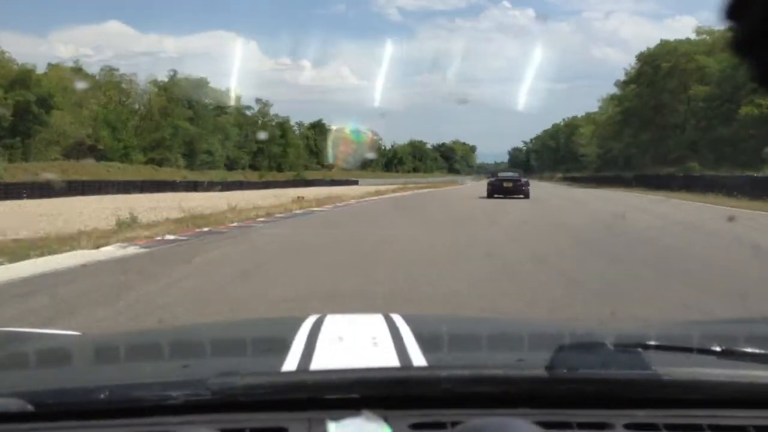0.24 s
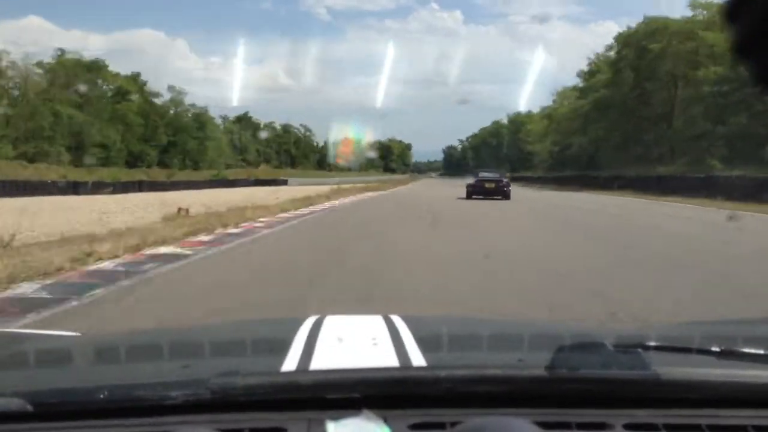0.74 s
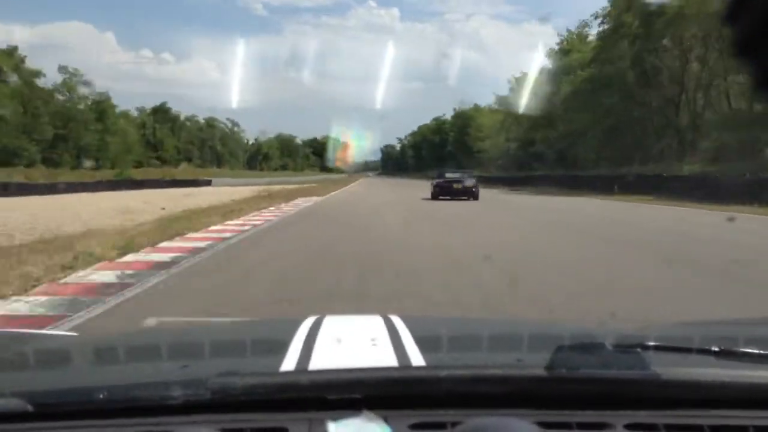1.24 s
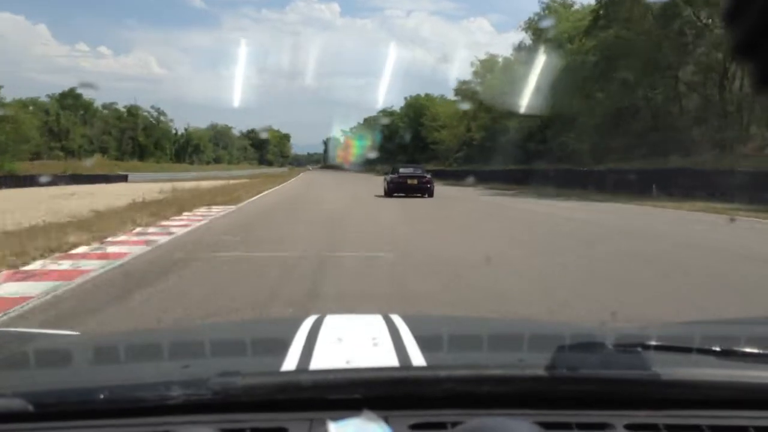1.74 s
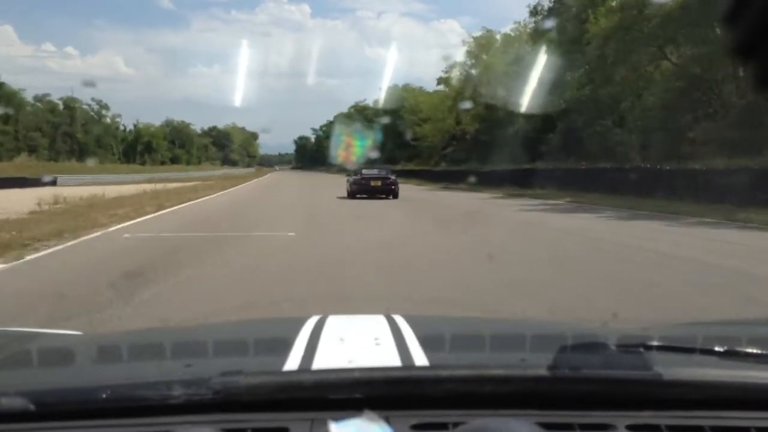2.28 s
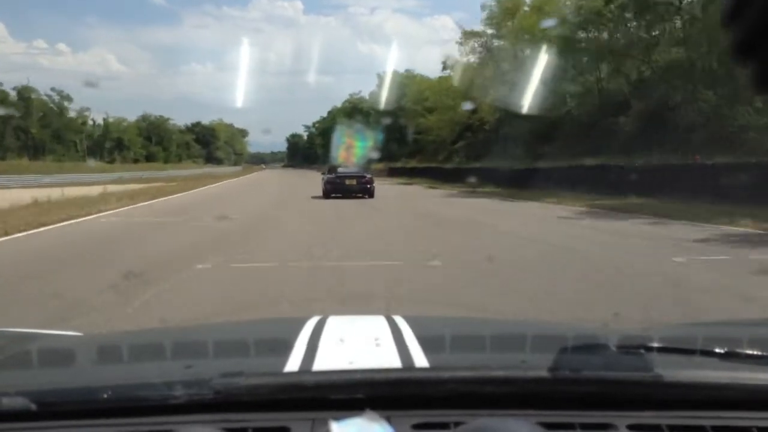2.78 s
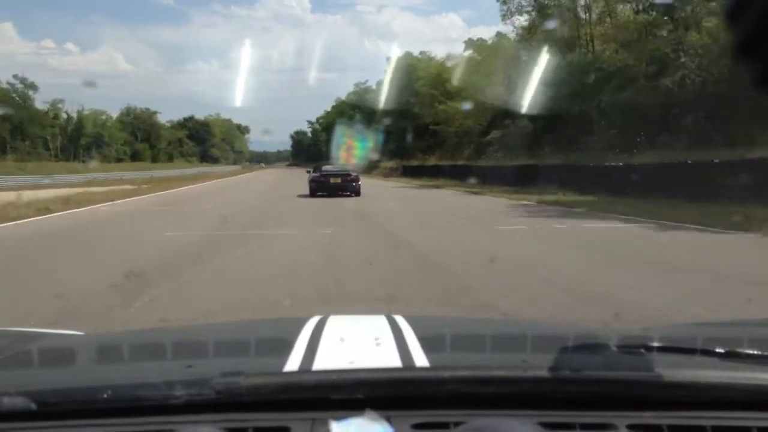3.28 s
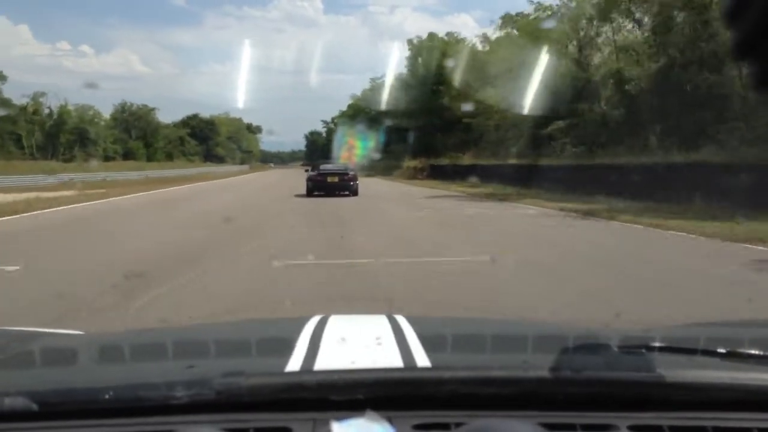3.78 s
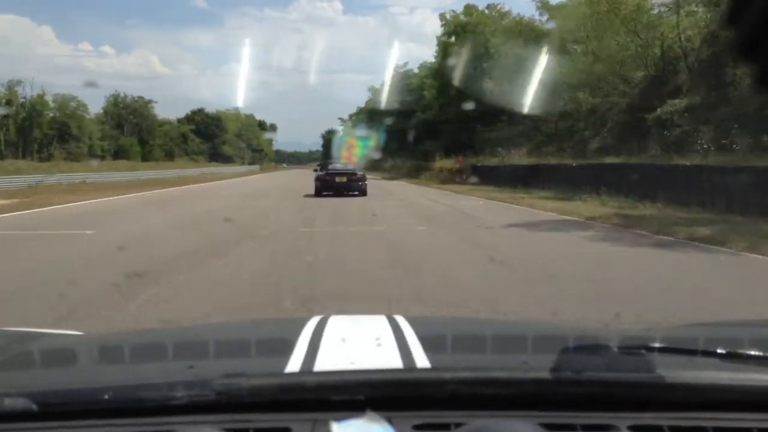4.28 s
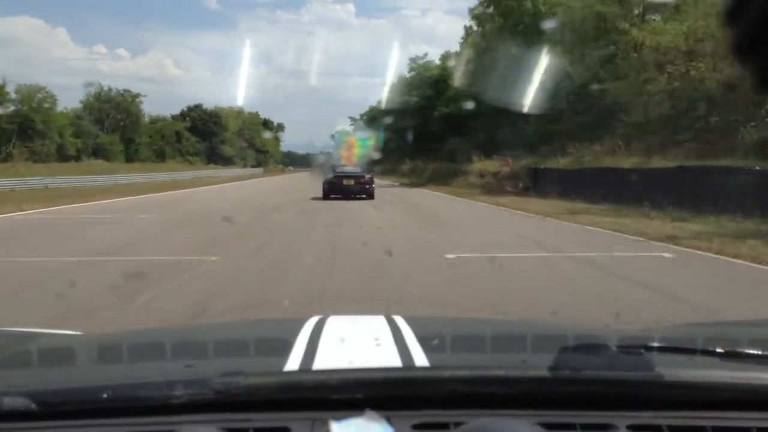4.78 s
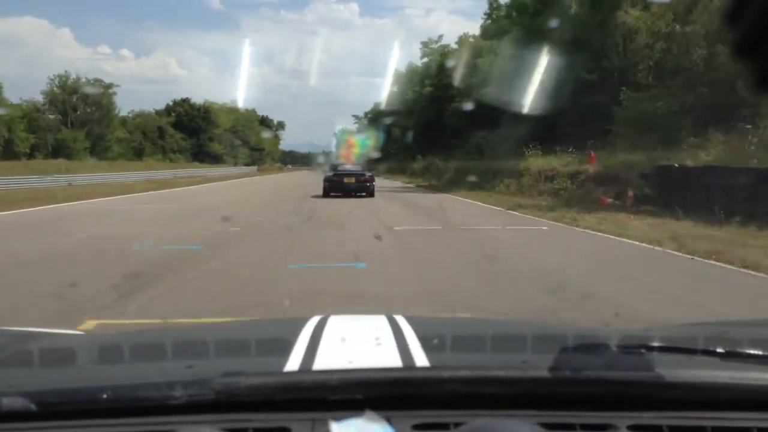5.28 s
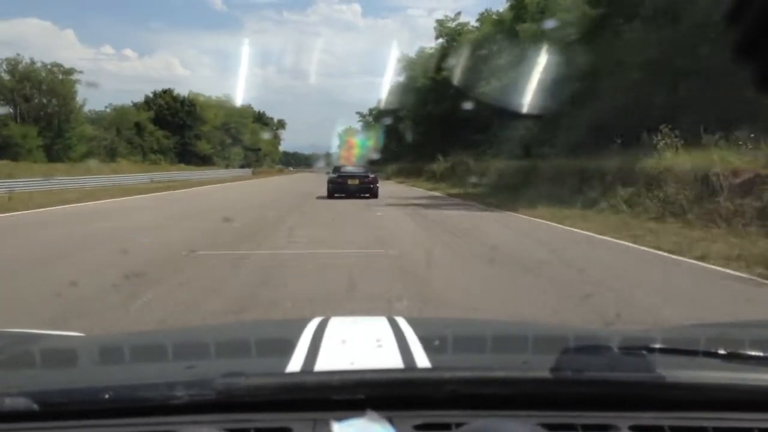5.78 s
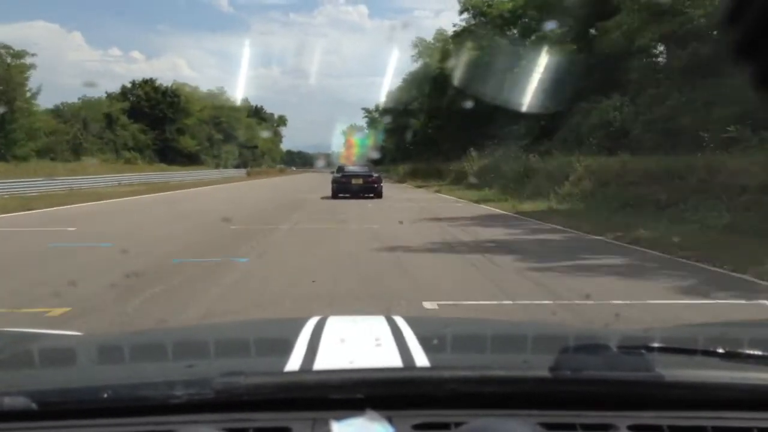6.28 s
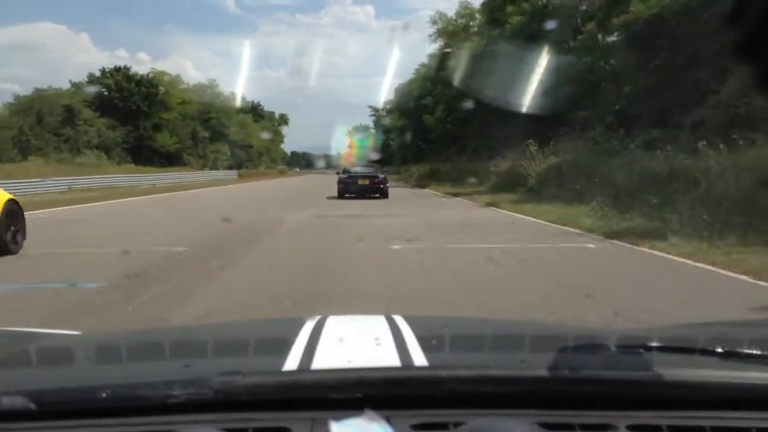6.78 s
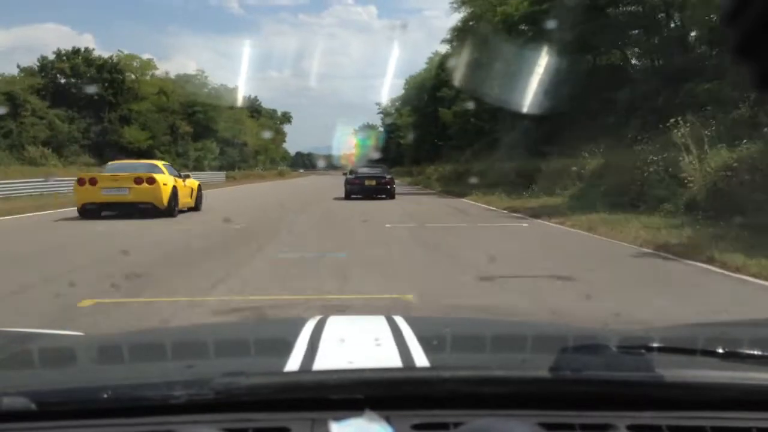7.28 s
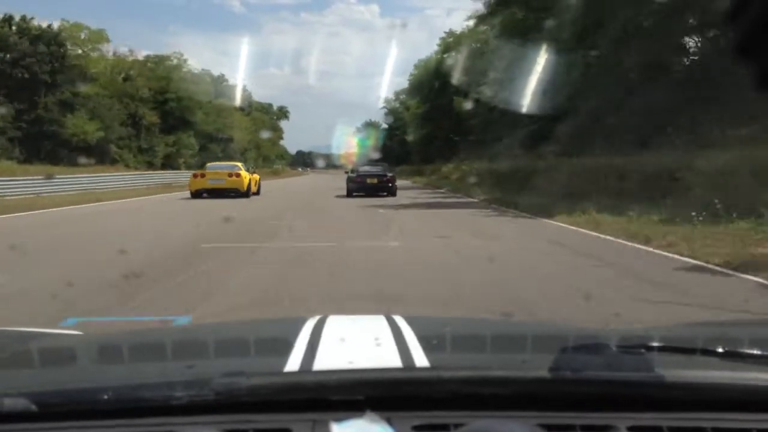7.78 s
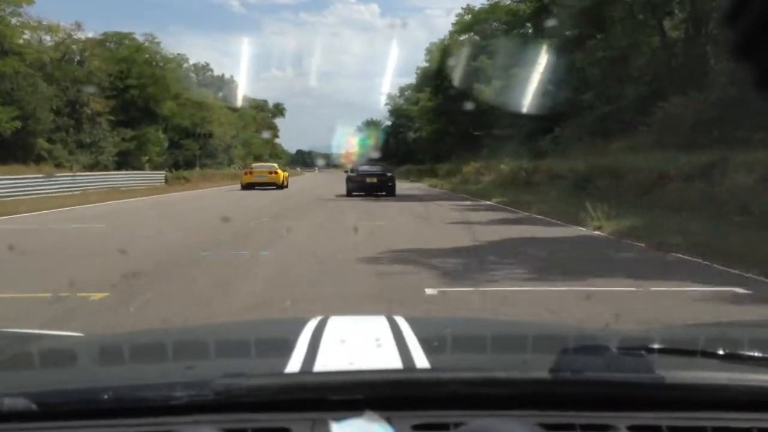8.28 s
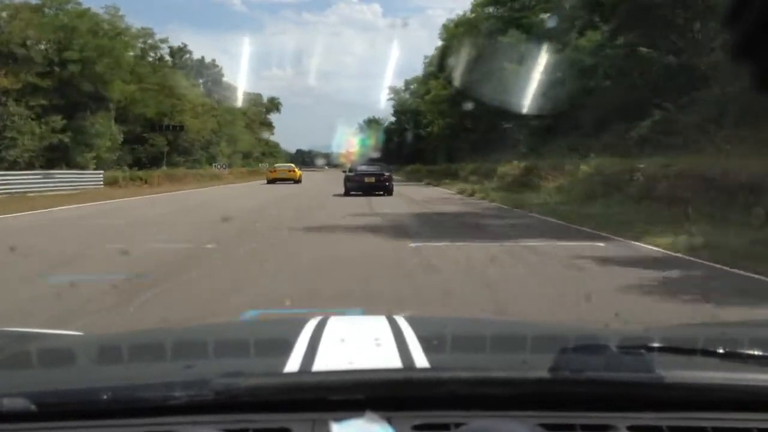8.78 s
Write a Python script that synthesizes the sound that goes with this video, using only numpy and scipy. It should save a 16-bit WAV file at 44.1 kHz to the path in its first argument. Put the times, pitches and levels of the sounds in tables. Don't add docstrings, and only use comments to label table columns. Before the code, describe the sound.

Inside a car on a race circuit, the engine pulls hard, shifts up and settles into droning road noise; another car roars past on the left.

```python
import sys
import numpy as np
from scipy import signal
from scipy.io import wavfile
from scipy.ndimage import uniform_filter1d

SR = 44100
rng = np.random.default_rng(int(sys.argv[2]) if len(sys.argv) > 2 else 0)


def master_out(mix):
    frames = np.transpose(np.atleast_2d(mix))
    ceiling = np.clip(frames, -1, 1)
    pcm = np.round(ceiling * 32767).astype(np.int16)
    wavfile.write(sys.argv[1], SR, pcm)


def gain_from_db(level_db):
    decades = np.asarray(level_db, float) / 20
    return 10 ** decades


N = 399105

# (time [s], level [dB]); each layer follows by its share
ROUGHNESS = [(0, -1.5), (1.06, -6.5), (1.21, -2.5), (1.79, -1.5), (2.9, 2), (3.1, 0.5), (4.46, 1.5),
             (5.87, 0.5), (7.33, 0.5), (7.79, -1.5), (8.01, 0.5), (8.75, -1), (9.05, -1.5)]
# (frequency [Hz], level [dB per Hz])
ROAD_BOOM = [(18, -43), (30, -34), (50, -19.5), (65, -18.5), (82, -25), (100, -5), (130, -2), (221, -2.5),
             (377, -8.5), (436, -15.5), (600, -15), (780, -24)]
ROAD_ROAR = [(260, -24), (450, -0.5), (736, -5), (927, -5.5), (1020, -6), (1120, -4), (1360, -8),
             (3200, -24), (4160, -63), (7040, -120)]
ROAD_HISS = [(1290, -31), (2200, -1), (3060, -7), (3380, -3.5), (3660, -4.5), (7880, -9.5), (9490, -17),
             (13900, -20), (15200, -23)]
BOOM_DB, ROAR_DB, HISS_DB = -20.5, -30, -40
ROAR_SHARE, HISS_SHARE = 0.32, 0.25
# (frequency [Hz], width [Hz], level over the boom [dB])
PANELS = [(133.9, 5.4, -12), (151, 5.4, -10.5), (170.1, 7.4, -10), (312.8, 7.1, -15), (427.7, 12, -15),
          (589, 48, -23), (839, 18, -22.5), (925, 140, -18.5), (1117, 24, -25), (1336, 82, -27),
          (1654, 24, -30)]
# (start [s], end [s], frequency [Hz], level [dB])
CAVITY = [
    (1.322, 1.549, 230.1, -26),
    (2.304, 2.896, 234.3, -26),
    (2.904, 3.692, 232.1, -23.5),
    (3.685, 4.294, 229.4, -22),
    (4.7, 5.289, 225.3, -26),
    (5.296, 6.593, 232, -23.5),
    (7.9, 8.5, 231.3, -29),
]
CAVITY_IDLE_DB, CAVITY_EDGE_S = -33.5, 0.21
# (start [s], end [s], level over the steady hiss [dB])
GUSTS = [
    (1.45, 1.62, 2),
    (2.7, 3.0, 2),
    (5.4, 5.55, 1),
    (7.9, 8.1, 2),
]
GUST_EDGE_S = .08

# (time [s], thud level [dB], thud length [s], dip of the firing tone
# [dB])
JOLTS = [(1.215, -31, .016, -12), (1.315, -50, .016, -8), (1.6, -50, .03, -3), (1.715, -50, .012, -9),
         (1.755, -50, .012, -9), (1.838, -34, .025, -18), (2.718, -30, .06, -7), (2.84, -34, .05, -5),
         (2.93, -24, .08, -8), (3.04, -26, .045, -6), (4.34, -26, .06, -7)]
DIP_SPREAD = 1.66
# (frequency [Hz], level [dB per Hz])
THUD_COLOUR = [(55, -36), (85, 5), (130, 6), (300, -18), (900, -29)]

# (time [s], peak level [dB], brightness [0-1])
GRIT = [(.3254, -18.5, .3), (.3645, -20, .2), (.4194, -33, 0.4), (.7462, -29.5, 0.7), (1.1997, -27.5, 0.6),
        (1.5604, -33, .3), (3.1213, -37, .3), (3.475, -29.5, .3), (3.5494, -36, .3), (3.6172, -31, .3),
        (3.449, -35, .3), (3.775, -32, .3), (4.276, -43, .3), (4.299, -37, .3), (4.3994, -31, .3),
        (4.46, -32, .3), (4.56, -34, .3), (4.8693, -34, .1), (5.027, -22, 0.36), (5.1694, -32, .3),
        (5.2275, -21.5, 0.45), (7.838, -37, .1), (7.87, -28, .1), (8.6911, -33, .3), (8.8298, -31, .3)]
STONES = [
    (7.7915, -19, 0.55),
    (7.862, -30, .5),
]
GRIT_T60_S, GRIT_RISE_S, STONE_T60_S, STONE_RISE_S = 0.15, 0.003, 0.059, 0.00072
# (frequency [Hz], level [dB per Hz])
GRIT_COLOUR = [(1500, -30), (3300, 1.5), (5000, -1.5), (6500, 2.5), (8000, 4), (9500, -2.5), (12500, -9),
               (15500, -8)]
GRIT_BRIGHT = [(6000, -17), (9500, -5), (12000, 1), (14000, -2), (15500, -1)]
STONE_COLOUR = [(3800, -25), (5500, -2), (8000, -1), (11000, -2), (14500, 2), (15500, 1)]

# (start [s], end [s], frequency [Hz], width [Hz], level [dB])
RINGS = [
    (1.83, 1.93, 432, 8, -28),
    (0, .45, 2180, 60, -46),
    (.48, .55, 2190, 30, -38),
]
# (start [s], end [s], frequency [Hz], width [Hz], level [dB])
RISING = [
    (0, .7, 1182, 50, -46),
    (.3, 1.2, 836, 30, -41),
    (0, .55, 590, 15, -38),
    (.45, .8, 1235, 30, -43),
]
# (start [s], end [s], frequency [Hz], width [Hz], level [dB])
WHISTLE = [
    (0, 1.1, 11790, 10, -62),
]
# (start [s], end [s], frequency [Hz], width [Hz], level [dB])
CHIRPS = [(1.17, 1.205, 2590, 40, -38), (1.17, 1.2, 1045, 60, -35), (1.33, 1.36, 978, 60, -32),
          (1.395, 1.43, 980, 60, -31), (1.44, 1.47, 1020, 60, -31), (1.518, 1.547, 975, 40, -25),
          (1.553, 1.575, 1290, 160, -29), (1.55, 1.58, 1600, 400, -35), (1.675, 1.715, 950, 50, -30),
          (1.21, 1.24, 1100, 60, -34), (1.13, 1.17, 1290, 60, -35), (1.74, 1.8, 870, 40, -35),
          (1.235, 1.3, 165, 20, -25), (1.33, 1.4, 160, 30, -27), (1.6, 1.64, 900, 60, -35)]
# (start [s], end [s], frequency [Hz], width [Hz], level [dB])
WHINE = [
    (6.48, 6.72, 1655, 30, -41),
    (6.68, 7.12, 1678, 30, -40),
    (7.08, 7.32, 1688, 50, -40.5),
    (7.33, 7.49, 1703, 30, -42.5),
    (7.48, 7.79, 1686, 40, -41),
    (7.85, 8, 1690, 40, -43),
]
WANDER, WHINE_WANDER = .0025, .0055
RISING_GLIDE, WHISTLE_GLIDE, CHIRP_GLIDE = .035, -.0475, -.012

# (time [s], cam rate [Hz], level [dB])
BOOM = [
    (5.2, 46, -58),
    (5.4, 46.7, -28),
    (5.8, 47.7, -23),
    (6.0, 48.93, -15),
    (6.12, 48.9, -14),
    (6.3, 48.7, -16),
    (6.42, 47.8, -17),
    (6.6, 46.3, -31),
    (6.68, 45.2, -45),
]
# (time [s], cam rate [Hz], level [dB])
RASP = [
    (5.95, 50.1, -64),
    (6.1, 49.3, -30),
    (6.2, 49.8, -27.5),
    (6.3, 49.84, -23),
    (6.4, 50, -20.5),
    (6.5, 49.5, -17),
    (6.62, 47.86, -19.5),
    (6.65, 47.1, -35),
    (6.68, 47.35, -52),
]
# (time [s], cam rate [Hz], level [dB])
AWAY = [
    (7.68, 34.4, -45),
    (7.8, 34.8, -22.5),
    (7.95, 35.06, -20),
    (9.05, 37.1, -19.5),
]
BURBLE_PER_S = 16
# (multiple of the cam rate, level [dB])
BOOM_ORDERS = [(3, -10), (5, -5), (6, 0), (7, -11), (9, -14), (12, -17)]
RASP_ORDERS = [(4, -1.5), (6, -3), (7, -11), (8, -1.5), (9, -4.5), (11, -13), (12, -6), (15, -14),
               (16, -3.5), (17, -14), (20, -19), (21, -6.5), (22, -16), (23, -18), (24, -16)]
AWAY_ORDERS = [(4, -12), (5, -10), (8, -2), (9, -16), (10, -17.5), (12, -22), (16, -31)]
# (start [s], end [s], multiple, level [dB])
PASS_FAVOURED = [(6.4, 6.3, 16, -9), (6.35, 6.53, 16, 2.5), (6.55, 8, 16, -8), (6.28, 6.48, 21, -5),
                 (6.2, 6.3, 12, 3), (5.3, 5.4, 8, 5), (5.7, 6.45, 8, 4.5), (5.7, 6.45, 17, 3.5),
                 (4.9, 6.2, 21, 9.5), (5.7, 5.9, 5, -13), (6.47, 6.7, 8, -7), (6.9, 5.8, 20, 5),
                 (5.9, 6.1, 12, -3), (6.45, 6.7, 9, 1.5), (8.1, 8.3, 5, 8), (8.45, 8.7, 8, 2),
                 (8.68, 8.8, 8, -6), (8.92, 9.2, 8, -11)]
# (time [s], nearness [dB], tyre hiss over roar [dB])
RUSH = [
    (5.6, -37, -8),
    (5.95, -22.5, -16.5),
    (6.06, -16.5, -14.5),
    (6.3, -10.5, -13.5),
    (6.42, -9, -12),
    (6.49, -8, -6),
    (6.52, -15, -1),
    (6.615, -13, -4),
    (6.655, -17.5, -15.5),
]
RUSH_TAIL_S, RUSH_TAIL_DB = .13, -13
# (frequency [Hz], level [dB per Hz])
RUSH_ROAR = [(250, -32), (500, 5), (1050, 8.5), (1500, 1), (1900, -4.5), (2500, -6), (3500, -8),
             (6000, -50)]
RUSH_HISS = [(1200, -32), (2200, -7), (3300, -2.5), (4200, 0), (5400, 2), (7500, -1), (9500, -8.5),
             (12500, -8.5), (15500, -11)]
# (start [s], end [s], frequency [Hz], width [Hz], level [dB])
FLANK = [(6.1, 6.19, 1040, 40, -26), (6.24, 6.3, 645, 45, -25), (6.31, 6.37, 835, 45, -19),
         (6.04, 6.11, 1800, 400, -34), (6.04, 6.11, 2250, 400, -35), (6.04, 6.12, 2650, 400, -35),
         (6.53, 6.62, 1030, 50, -28), (6.45, 6.5, 1100, 60, -27), (6.44, 6.5, 3270, 390, -29),
         (6.55, 6.61, 3300, 200, -28), (6.39, 6.52, 790, 30, -25), (6.2, 6.5, 1000, 400, -29),
         (6.22, 6.5, 1350, 400, -31), (6.44, 6.475, 6500, 250, -23), (6.475, 6.51, 5400, 300, -22),
         (6.53, 6.575, 6300, 300, -26), (6.55, 6.62, 5350, 250, -27), (6.375, 6.4, 6200, 300, -28),
         (6.48, 6.52, 4500, 250, -28)]
# (start [s], end [s], frequency [Hz], width [Hz], level [dB])
SWISH = [
    (6.44, 6.51, 6400, 390, -26),
    (6.53, 6.6, 7600, 500, -28),
]
# (start [s], end [s], frequency [Hz], width [Hz], level [dB])
STREAKS = [
    (6.12, 6.28, 2220, 390, -32),
    (6.15, 6.22, 1900, 250, -34),
    (6.24, 6.33, 1900, 250, -35),
    (6.38, 6.46, 2600, 200, -33),
    (6.52, 6.58, 2520, 140, -34),
    (6.5, 6.6, 2050, 140, -37),
]
FLANK_GLIDE, SWISH_GLIDE, STREAK_GLIDE = -.03, -.22, .07

# (time [s], firing rate [Hz], firing tone level [dB])
ENGINE = [(0, 130, -8), (.3, 133.5, -7.5), (.7, 138, -7.5), (1.05, 140.3, -10), (1.17, 141.1, -10),
          (1.23, 139.2, -15), (1.32, 133.5, -15.5), (1.4, 126.2, -17), (1.6, 113.7, -19.5),
          (1.78, 105.8, -21), (2.02, 100.7, -20), (3.2, 100.9, -20.5), (4.0, 98.16, -20), (4.7, 97.12, -24),
          (5.4, 98.2, -21.5), (6.6, 98.91, -24.5), (7.8, 99.48, -22.5), (9.05, 99.8, -21.5)]
UPPER = [2.5, 3, 3.5, 4, 4.5, 5, 5.5, 6, 6.5, 7, 8, 9]
UPPER_DB = [-4, -4.5, -7.5, -7.5, -6.5, -9, -16, -12.5, -8.5, -22, -26, -12.5]
# (frequency [Hz], level [dB])
CABIN = [(230, -3), (255, -12), (295, 0), (350, -2.5), (420, -4), (520, -7), (700, -10), (1300, -12.5)]
# (start [s], end [s], multiple, level [dB])
FAVOURED = [(1, 5.9, 2.5, -3.5), (0, .3, 3, -5.5), (0.1, 0.63, 3, 3.5), (5, 5.5, 3, 4),
            (.1, 0.64, 3.5, 2.5), (0.7, 1.2, 3.5, -5), (1, 2.5, 3.5, 2.5), (0, 0.77, 4, -7),
            (0.3, 1.2, 4, 1.5), (2, 2.8, 4, 5), (2, 4.3, 4, -7), (-.5, .3, 4.5, 6.5), (.8, 1.2, 4.5, -2),
            (3.5, 3.6, 4.5, -13), (4, 5.1, 4.5, 4.5), (7, 8.5, 4.5, -5), (.3, .75, 5, -7), (2, 2.5, 5, 5),
            (2.5, 3.6, 5, -7), (-1, .62, 5.5, 11), (-1, 1.2, 5.5, -8), (.45, 1.2, 6, 4.5), (5.5, 5.8, 6, 5),
            (6.5, 9, 6, 7.5), (.1, .38, 6.5, 2), (-0.2, 1.2, 6.5, -12), (5.5, 5.4, 6.5, -9),
            (-2, .24, 9, 8)]
FAVOUR_EDGE_S = 0.1
# (start [s], end [s], upper tones [dB], doubled firing tone [dB])
THROTTLE = [
    (-.1, 1.198, -22.5, -27.5),
    (1.88, 2.674, -23, -40),
    (2.979, 4.1, -28.5, -34),
    (4.521, 4.867, -26, -25),
    (4.9, 6.397, -21, -25),
    (6.746, 7.51, -24.5, -31),
    (7.501, 9.2, -25.5, -32.5),
]
COAST_UPPER_DB, COAST_DOUBLE_DB, PEDAL_S = -39, -33, 0.063
# (start [s], end [s], level [dB])
STUMBLES = [
    (.1, 1.0, -33.5),
    (1.65, 1.75, -25),
    (1.88, 1.97, -21.5),
    (2.06, 2.45, -19),
    (2.8, 3.0, -25),
    (3.4, 3.7, -23.5),
    (3.7, 4.3, -28.5),
    (6.08, 6.3, -22),
    (8.52, 8.68, -33),
    (8.95, 9.2, -26),
]
SMOOTH_DB, STUMBLE_EDGE_S = -41, 0.044
# (frequency [Hz], level [dB per Hz])
CLATTER = [(1700, -8), (2100, 2), (2500, 3), (2900, 1.5), (3200, -14)]

# (time [s], gain [dB])
GAIN = [
    (0, -1),
    (1.2, -0.5),
    (1.3, -0.5),
    (5.9, -1),
    (6.62, -6.5),
    (7.8, -2.5),
    (9.05, -1),
]


def evened(x):
    return x / np.sqrt(np.mean(x ** 2) + 1e-20)


def add(mix, s, sound):
    part = mix[round(s * SR):][:len(sound)]
    part += sound[:len(part)]


def curves(rows):
    s, *columns = np.transpose(rows)
    end = N if s[-1] > 9 else round(s[-1] * SR)
    t = np.arange(round(s[0] * SR), end) / SR
    return [np.interp(t, s, column) for column in columns]


def spells(rows, rest, edge_s):
    out = np.full(N, float(rest))
    for row in rows:
        out[max(round(row[0] * SR), 0):round(row[1] * SR)] = row[-1]
    return uniform_filter1d(out, max(round(edge_s * SR), 1), mode="nearest")


def drift(per_s, size=N):
    steps = np.arange(N // 100 + 2)
    b, a = signal.butter(2, min(per_s * 200 / SR, .9))
    smooth = signal.lfilter(b, a, rng.standard_normal(len(steps)))
    return np.interp(np.arange(size) / 100, steps, evened(smooth))


def noise(points, size, patchy_db, count=N):
    hz = np.fft.rfftfreq(size, 1 / SR)
    f, db = np.transpose(points)
    a, b, patches = rng.standard_normal((4 * count // size + 5, len(hz), 3)).T
    patches = uniform_filter1d(patches, size=12, axis=0)
    patches = evened(uniform_filter1d(patches, size=10, axis=1))
    colour_db = np.interp(np.log(hz + 1), np.log(f + 1), db, left=-90, right=-90)
    spectra = (a + 1j * b) * gain_from_db(colour_db[:, None] + patchy_db * patches)
    return evened(signal.istft(spectra, nperseg=size, noverlap=3 * size // 4)[1][:count])


def fuzzy(hz, width_hz):
    turn = 2 * np.pi * np.cumsum(hz) / SR
    across = drift(width_hz / 2, len(hz)) * np.cos(turn)
    return across + drift(width_hz / 2, len(hz)) * np.sin(turn)


def stack(hz, orders, waver_db, wobble, colour=((1, 0), (2, 0)), favoured=(), start=0, fray=0):
    turns, size, out = np.cumsum(hz) / SR, len(hz), 0
    for k, db in orders:
        level_db = db + np.interp(k * hz[::20], *np.transpose(colour)) + waver_db * drift(5.3, size)[::20]
        rows = [row for row in favoured if abs(row[-2] - k) < .25]
        if rows:
            level_db = level_db + spells(rows, 0, FAVOUR_EDGE_S)[round(start * SR):][:size:20]
        phase = wobble * drift(10.4, size)
        if fray:
            phase = phase + fray * k * drift(24, size)
        level = np.repeat(gain_from_db(level_db), 20)[:size]
        out = out + np.sqrt(2) * level * np.cos(2 * np.pi * (k * turns + rng.random()) + phase)
    return out


def rings(rows, glide=0, wander=WANDER):
    out = np.zeros(N)
    for start, end, hz0, width_hz, db in rows:
        along = np.linspace(0, 1, round((end - start) * SR))
        hz = hz0 * (1 + glide * along ** 1.5 + wander * drift(6, len(along)))
        if width_hz < 100:
            tone = 1.2 * np.cos(2 * np.pi * np.cumsum(hz) / SR) + .3 * fuzzy(hz, width_hz)
        else:
            tone = 1.1 * fuzzy(hz, width_hz)
        fade = abs(np.sin(np.pi * along)) ** .35
        add(out, start, gain_from_db(db) * fade * tone)
    return out


def road():
    rough_db, = curves(ROUGHNESS)
    boom = gain_from_db(-1) * noise(ROAD_BOOM, size=4096, patchy_db=.3)
    panels = 0
    for f, width_hz, db in PANELS:
        level = gain_from_db(db + 1.3 * drift(2.5))
        panels = panels + level * fuzzy(f * (1 + .008 * drift(1.5)), width_hz)
    cavity_hz = spells([row[:-1] for row in CAVITY], 230, CAVITY_EDGE_S)
    cavity_db = spells(CAVITY, CAVITY_IDLE_DB, CAVITY_EDGE_S)
    cavity = gain_from_db(cavity_db) * stack(cavity_hz, [(1, 0)], waver_db=1.3, wobble=.3)
    roar_db = ROAR_DB + ROAR_SHARE * rough_db + 0.58 * drift(31.0)
    roar = gain_from_db(roar_db) * noise(ROAD_ROAR, size=1024, patchy_db=1.15)
    hiss_db = HISS_DB + HISS_SHARE * rough_db + spells(GUSTS, 0, GUST_EDGE_S) + 0.67 * drift(10.5)
    hiss = gain_from_db(hiss_db) * noise(ROAD_HISS, size=256, patchy_db=1.13)
    return gain_from_db(BOOM_DB + rough_db) * (boom + panels) + cavity + roar + hiss


def jolts():
    swell = np.zeros(N)
    for s, db, length, _ in JOLTS:
        add(swell, s - length / 3, gain_from_db(db) * np.hanning(round(length * SR)))
    return swell * noise(THUD_COLOUR, size=2048, patchy_db=0.0)


def grit():
    t = np.arange(SR // 4) / SR
    puffs, bright_part, hits = np.zeros((3, N))
    for rows, body, t60, rise in ((GRIT, puffs, GRIT_T60_S, GRIT_RISE_S),
                                  (STONES, hits, STONE_T60_S, STONE_RISE_S)):
        for s, db, bright in rows:
            shape = gain_from_db(db - 7.0 - 60 * t / t60) * (1 - np.exp(-t / rise))
            add(body, s - .0015, shape)
            add(bright_part, s - .0015, bright * shape)
    out = puffs * noise(GRIT_COLOUR, size=256, patchy_db=2.2)
    out += bright_part * noise(GRIT_BRIGHT, size=256, patchy_db=2.2)
    return out + hits * noise(STONE_COLOUR, size=256, patchy_db=2.2)


def cabin_tones():
    out = rings(RINGS) + rings(WHINE, 0, WHINE_WANDER) + rings(RISING, RISING_GLIDE)
    return out + rings(WHISTLE, WHISTLE_GLIDE) + rings(CHIRPS, CHIRP_GLIDE)


def passing_rush():
    tail = np.add(RUSH[-1], (RUSH_TAIL_S, RUSH_TAIL_DB, 0))
    near_db, hiss_db = curves(RUSH + [tail])
    roar = noise(RUSH_ROAR, size=1024, patchy_db=2.2, count=len(near_db))
    hiss = noise(RUSH_HISS, size=512, patchy_db=1.3, count=len(near_db))
    return gain_from_db(near_db) * (gain_from_db(-6.5) * roar + gain_from_db(hiss_db) * hiss)


def passing_car():
    out = rings(FLANK, FLANK_GLIDE) + rings(SWISH, SWISH_GLIDE) + rings(STREAKS, STREAK_GLIDE)
    for rows, orders, burble_db in ((BOOM, BOOM_ORDERS, .6), (RASP, RASP_ORDERS, .6), (AWAY, AWAY_ORDERS, 2)):
        start = rows[0][0]
        hz, db = curves(rows)
        level = gain_from_db(db + burble_db * drift(BURBLE_PER_S, len(db)))
        exhaust = stack(hz, orders, waver_db=1.8, wobble=.25, favoured=PASS_FAVOURED, start=start, fray=.022)
        add(out, start, level * exhaust)
    add(out, RUSH[0][0], passing_rush())
    return out


def engine():
    hz, firing_db = curves(ENGINE)
    t = np.arange(N) / SR
    for s, _, length, db in JOLTS:
        firing_db = firing_db + db * np.maximum(1 - abs(t - s) / (DIP_SPREAD * length), 0)
    firing = gain_from_db(firing_db) * stack(hz, [(1, 0)], waver_db=-0.76, wobble=0.2)
    uneven_db = spells(STUMBLES, SMOOTH_DB, STUMBLE_EDGE_S)
    uneven = gain_from_db(uneven_db) * stack(hz, [(1.5, 0)], waver_db=1.2, wobble=.25)
    double_db = spells(THROTTLE, COAST_DOUBLE_DB, PEDAL_S)
    double = gain_from_db(double_db) * stack(hz, [(2, 0)], waver_db=0.0, wobble=0.24)
    upper_db = spells([row[:-1] for row in THROTTLE], COAST_UPPER_DB, PEDAL_S)
    upper = gain_from_db(upper_db) * stack(hz, zip(UPPER, UPPER_DB), waver_db=1.1, wobble=.18,
                                  colour=CABIN, favoured=FAVOURED, fray=.012)
    clatter_db = -53.5 + 0.28 * (hz - 99.5)
    clatter = gain_from_db(clatter_db) * noise(CLATTER, size=512, patchy_db=1.5)
    return firing + uneven + double + upper + clatter


def scene():
    return (road() + jolts() + grit() + cabin_tones() + passing_car() + engine())[None]


def low_pass(x):
    return signal.sosfilt(signal.butter(12, 15310, fs=SR, output="sos"), x)


def record(dry):
    ducked = dry * gain_from_db(curves(GAIN)[0])
    limited = ducked / (1 + abs(ducked / .705) ** 12) ** (1 / 12)
    band = signal.firwin(255, 15350, window=("kaiser", 8), fs=SR)
    finished = signal.oaconvolve(limited, band[None], "same")
    return low_pass(finished)


dry = scene()
out = record(dry)
master_out(out)
```